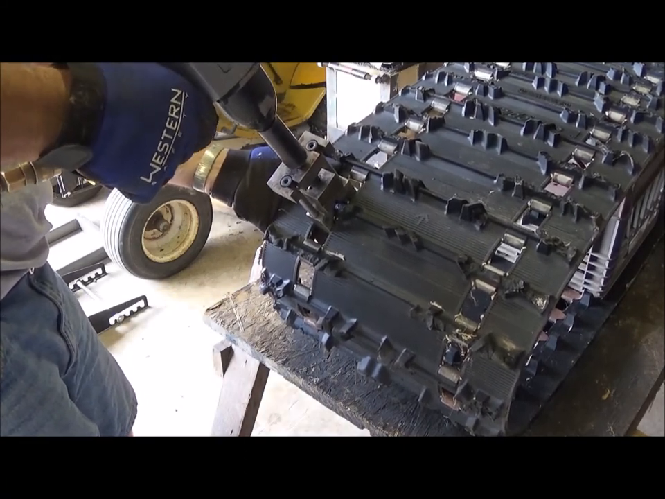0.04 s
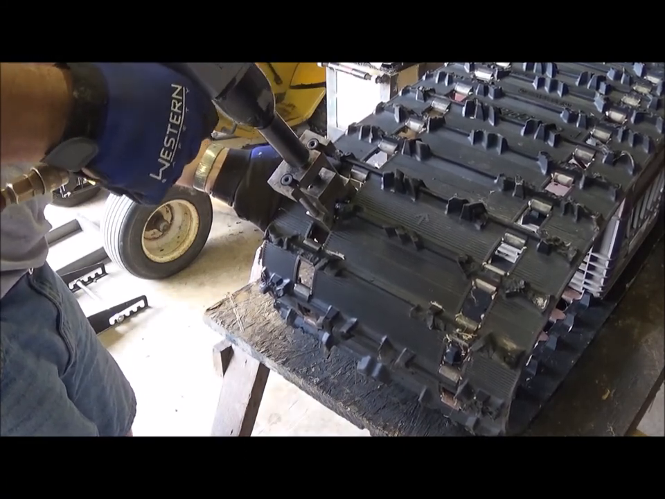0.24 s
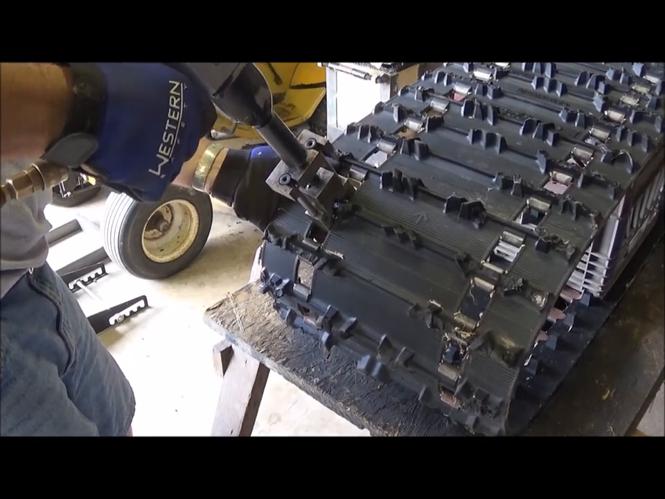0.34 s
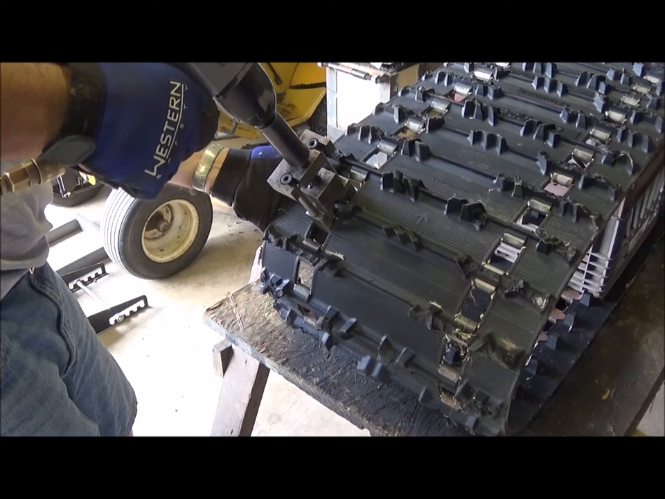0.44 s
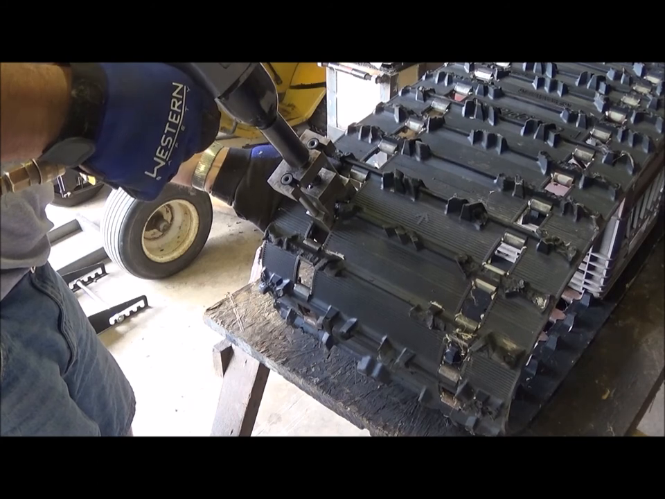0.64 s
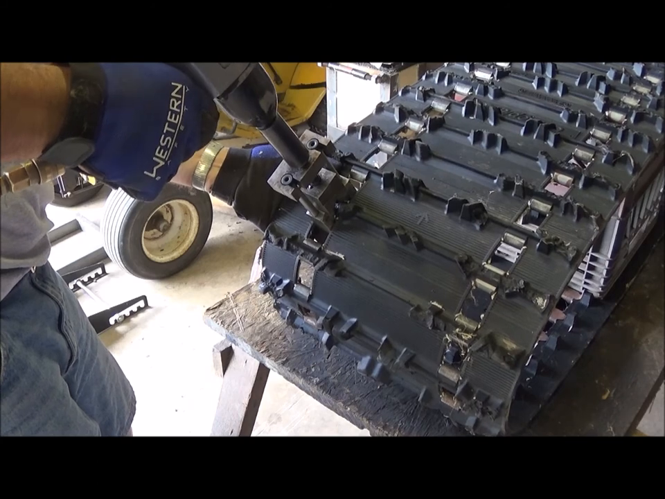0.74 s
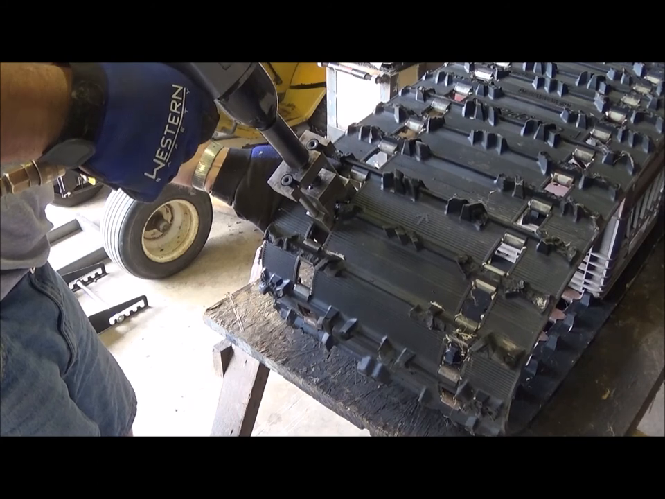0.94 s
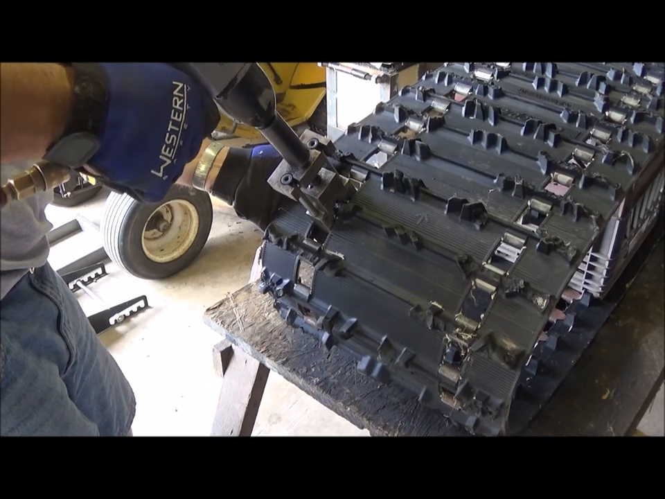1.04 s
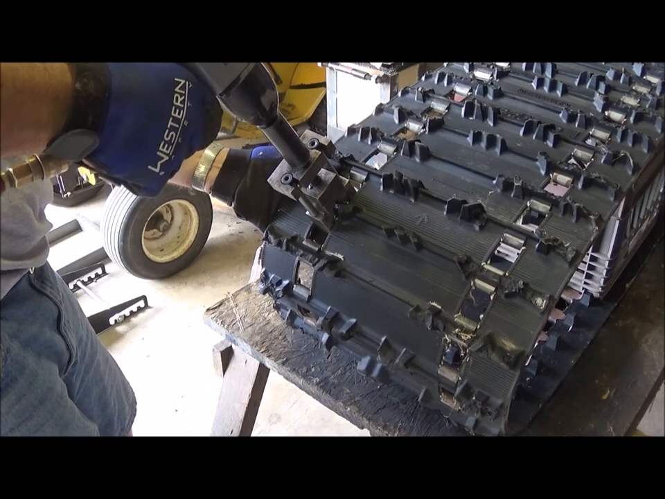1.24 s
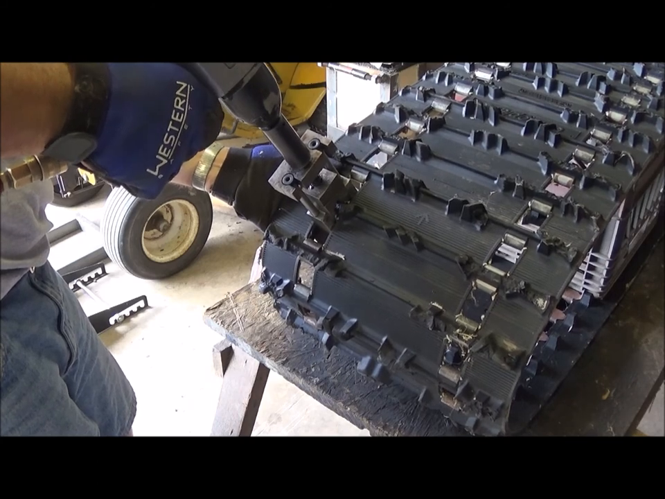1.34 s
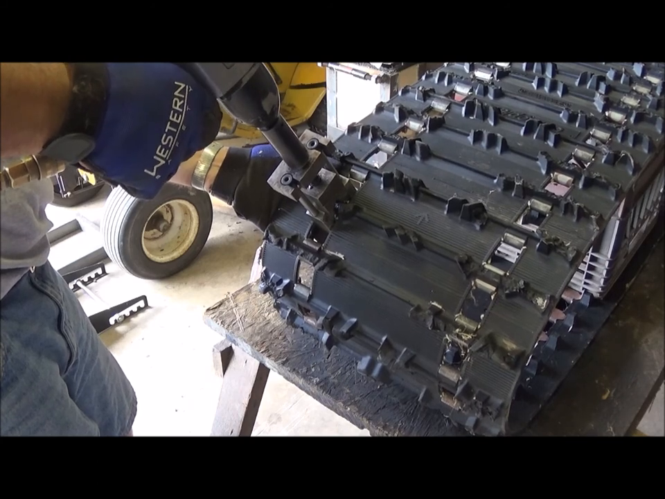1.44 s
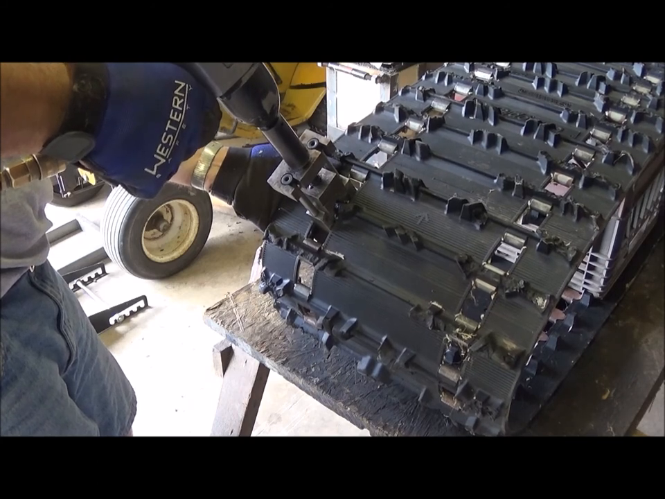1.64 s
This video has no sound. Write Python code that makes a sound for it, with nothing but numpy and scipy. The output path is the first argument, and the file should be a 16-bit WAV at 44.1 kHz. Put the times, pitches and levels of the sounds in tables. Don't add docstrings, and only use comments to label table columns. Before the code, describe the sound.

An air-powered wrench close to the microphone gives two brief loud bursts, each opening with a knock and hiss, buzzing with metallic hammering, then ending in a clack; garage echo, faint bird and trill between.

```python
import sys
import numpy as np
from scipy import signal
from scipy.fft import rfft, irfft
from scipy.io import wavfile
from scipy.ndimage import uniform_filter1d

SR = 44100
rng = np.random.default_rng(int(sys.argv[2]) if len(sys.argv) > 2 else 0)


def field_ratio(decibels):
    return 10 ** (np.asarray(decibels, dtype=float) / 20)


def to_wav(s):
    ch = np.atleast_2d(s).T
    pcm = np.round(np.clip(ch, -1, 1) * 32767)
    wavfile.write(sys.argv[1], SR, pcm.astype(np.int16))


N = 74970

# frequency in Hz, density in dB per Hz.
RATTLE = [(110, -52), (230, -11.5), (460, -18), (900, -6.5), (1300, -10.5), (5000, -3.5), (10500, -10.5),
          (16000, -20.5)]


def evened(x):
    return x / np.sqrt(np.mean(x ** 2) + 1e-20)


def read(points, hz):
    f, value = np.transpose(points)
    return np.interp(np.log(hz + 1), np.log(f + 1), value)


def colour(x, points):
    hz = np.fft.rfftfreq(x.shape[-1], 1 / SR)
    return irfft(rfft(x) * field_ratio(read(points, hz)), x.shape[-1])


def add(mix, s, sound):
    part = mix[round(s * SR):][:len(sound)]
    part += sound[:len(part)]


def resonate(x, hz, width):
    turn = np.exp(2j * np.pi * hz * np.arange(len(x)) / SR)
    r = np.exp(-np.pi * width / SR)
    return 2 * (turn * signal.lfilter([1 - r], [1, -r], x / turn)).real


def bank(x, modes):
    return evened(sum(field_ratio(db) * evened(resonate(resonate(x, f, w), f, w)) for f, w, db in modes))


def pair(x, same):
    common = x[0] * np.sqrt((1 + same) / 2)
    different = x[1] * np.sqrt((1 - same) / 2)
    return np.array([common + different, common - different])


def vane_turns(run, coast, top_hz):
    spin_s, spin_from, coast_slow, jitter = .032, .45, .1, .012
    hz = top_hz * (1 - spin_from * np.exp(-(run / spin_s) ** 1.5 / 2)) * (1 - coast_slow * coast)
    wander = evened(uniform_filter1d(rng.standard_normal(len(run)), size=300))
    return np.cumsum(hz * (1 + jitter * wander)) / SR


def exhaust(puffs, upper):
    # resonance in Hz, width in Hz, level in dB.
    port_modes = [(5080, 770, 4.5), (5498, 550, -1), (8680, 370, -2), (9680, 1100, 1)]
    a, d = rng.standard_normal((2, len(puffs)))
    low_ports = bank(puffs * a, port_modes[:2])
    high_ports = upper * field_ratio(-1) * bank(puffs * a, port_modes[2:])
    leak = field_ratio(-12) * evened(colour(puffs * d, RATTLE))
    low_pass = signal.butter(2, 200, fs=SR, output="sos")
    rumble = field_ratio(-47.5) * evened(signal.sosfilt(low_pass, d))
    return field_ratio(-3) * (low_ports + high_ports) / np.sqrt(2) + upper * leak + rumble


def housing(puffs):
    # resonance in Hz, width in Hz, level in dB.
    housing_modes = [(898, 140, -12.5), (1098.5, 70, -12.5), (1580, 440, -9.5), (2309, 140, -9),
                     (2729, 130, -6), (3350, 130, -8), (4173, 190, -8.5), (8200, 1200, -3)]
    b, c = rng.standard_normal((2, len(puffs)))
    return field_ratio(-8) * bank(puffs * b, housing_modes) + field_ratio(-2.5) * evened(colour(puffs * c, RATTLE))


def vane_hum(turns, size):
    # multiple of the vane rate, level in dB.
    harmonics = [(1, -.5), (2, -1.5), (3, -6), (4, -7)]
    tone = sum(field_ratio(db) * np.sin(2 * np.pi * k * turns) for k, db in harmonics)
    return field_ratio(-19.5) * uniform_filter1d(size, size=400) * tone


def air_burst(opens, shuts, stops, pressure_db, top_hz):
    hiss_rise_s, motor_lag_s, motor_rise_s = .018, .034, .036
    valve_snap_s, rotor_stop_s = .002, .0045
    coast_db, coast_fade_db = -9.5, -6
    t = np.arange(0, stops - opens, 1 / SR)
    on = shuts - opens
    run = np.maximum(t - motor_lag_s, 0)
    coast = np.clip((t - on) / (stops - shuts), 0, 1)
    turns = vane_turns(run, coast, top_hz)
    size = field_ratio(4 * rng.standard_normal(200))[turns.astype(int)]
    puffs = .69 + size * np.exp(-(turns % 1) / .35)
    shut = np.clip((t - on) / valve_snap_s, 0, 1)
    held = field_ratio(pressure_db - .5 * t / on)
    air = held * np.minimum(t / hiss_rise_s, 1) ** 1.43 * (1 - shut)
    motor = held * np.minimum(run / motor_rise_s, 1) * field_ratio(shut * coast_db + coast_fade_db * coast)
    motor = motor * np.minimum((t[-1] - t) / rotor_stop_s, 1)
    upper = np.minimum(t / (1.6 * hiss_rise_s), 1)
    noise = air * exhaust(puffs, upper) + motor * housing(puffs)
    return noise, motor * vane_hum(turns, size) * (1 - coast)


def hammer_blow(db, bright, ring_db):
    crack_t60_s, anvil_t60_s, contact_s = .025, .14, .0005
    t = np.arange(6000) / SR
    n = rng.standard_normal(len(t))
    crack = (1 - bright) * bank(n, [(3200, 9000, 0)]) + bright * bank(n, [(9700, 3200, 0)])
    ring = bank(n[::-1], [(14890, 70, 0)])[::-1]
    ring = ring * field_ratio(ring_db - 10 - 60 * t / anvil_t60_s)
    struck = .5 * crack * field_ratio(db - 60 * t / crack_t60_s) + ring
    struck = struck * np.minimum(t / contact_s, 1)
    return signal.sosfilt(signal.butter(2, 750, "highpass", fs=SR, output="sos"), struck)


def valve_thunk(db, tilt_db):
    # resonance in Hz, width in Hz, level in dB.
    valve_modes = [(360, 130, -6), (800, 200, -8), (1100, 70, -3), (1620, 400, -13), (2350, 160, -6)]
    t60_s, rise_s, bell_hz = .045, .0012, 1098
    t = np.arange(5000) / SR
    lowest_hz = valve_modes[0][0]
    tilted = [(f, w, g + tilt_db * np.log2(f / lowest_hz)) for f, w, g in valve_modes]
    bell = field_ratio(-3 + 2 * tilt_db) * np.sin(2 * np.pi * bell_hz * t)
    body = bank(rng.standard_normal(len(t)), tilted) + bell
    return field_ratio(db - 60 * t / t60_s) * np.minimum(t / rise_s, 1) * body


def inlet_squeal(half, db):
    t = np.arange(-3 * half, 3 * half, 1 / SR)
    breath = bank(rng.standard_normal(4000), [(9100, 1300, 0)])[:len(t)]
    return field_ratio(db) * np.exp(-(t / half) ** 2) * breath


def garage(x):
    # frequency in Hz, T60 in seconds.
    decay = [(200, 0.46), (530, 0.61), (1390, 0.5), (3680, .55), (7500, .52), (11000, 0.38), (15000, 0.33)]
    # frequency in Hz, level returned in dB.
    walls = [(60, -21.5), (280, 7.5), (700, 2.85), (3500, 0), (5200, -3), (7500, 3), (10000, -2),
             (15000, -6)]
    taps = np.zeros((2, SR))
    at = np.arange(200, SR - 20, 20) + rng.integers(0, 20, (2, (SR - 201) // 20))
    np.put_along_axis(taps, at, rng.choice([-1., 1.], at.shape), 1)
    hz, t, z = signal.stft(pair(taps, .86), SR, nperseg=256)
    tail = signal.istft(z * field_ratio(-60 * t / read(decay, hz)[:, None]), SR, nperseg=256)[1]
    tail = tail / np.linalg.norm(tail[0])
    return field_ratio(-7) * signal.fftconvolve(colour(x, walls)[None], tail, axes=1)[:, :N]


def bird():
    # start in seconds, length in seconds, first and last pitch in Hz, level in dB.
    whistles = [
        (.764, 0.049, 3350, 2740, -63),
        (.808, 0.026, 2540, 2670, -63),
        (.842, .045, 2560, 1950, -61),
        (.93, 0.04, 2180, 2155, -64),
        (.972, 0.039, 3010, 2820, -61.5),
    ]
    out = np.zeros(N)
    for start, length, from_hz, to_hz, db in whistles:
        u = np.arange(0, 1, 1 / (length * SR))
        phase = 2 * np.pi * np.cumsum(from_hz + (to_hz - from_hz) * u) / SR
        add(out, start, field_ratio(db - 1.5) * np.sin(np.pi * u) ** .53 * np.sin(phase))
    flutter = evened(uniform_filter1d(rng.standard_normal(N), size=250))
    return out * field_ratio(3 * (flutter + 3.5))


def trill():
    tone_hz, first_s, every_s, pulse_s = 2570, .027, .0333, .004
    t = np.arange(N) / SR
    beat = (t - first_s) / every_s
    nearest = np.round(beat)
    pulses = np.exp(-((beat - nearest) * every_s / pulse_s) ** 2)
    size = field_ratio(2.5 * rng.standard_normal(60))[nearest.astype(int) + 1]
    return field_ratio(-56.5) * size * pulses * np.sin(2 * np.pi * tone_hz * t)


def room_hush():
    # frequency in Hz, density in dB per Hz.
    hush_spectrum = [(30, -33.5), (120, -11.5), (300, -6), (800, -5), (2800, -5.5), (6500, -10),
                     (12000, -15.5), (15500, -24.5)]
    return field_ratio(-57.5) * evened(colour(pair(rng.standard_normal((2, N)), .64), hush_spectrum))


def scene():
    # valve opens, valve shuts and rotor stops in seconds, pressure in dB, top vane rate in Hz.
    bursts = [
        (.219, .4445, .486, -13, 284),
        (1.028, 1.269, 1.318, -14, 268),
    ]
    # time in seconds, peak in dB, brightness 0-1, anvil ring in dB.
    blows = [(0.2595, -9.5, 0.07, -27), (.2737, -0.5, 0, -32.5), (0.289, -2.5, 0.9, -46.5),
             (.353, -6, .3, -26), (0.376, 2.5, 0.2, -24.5), (.4238, -0.5, .15, -41),
             (0.4482, -1, 0.12, -13), (0.4864, -0.5, 0.28, -32.5), (.490, -24, 0.9, -44.5),
             (1.0615, -7.5, 0, -29.5), (1.066, -4, 0, -33.5), (1.073, -0.5, 0.8, -31),
             (1.0818, -7.5, 0, -37.5), (1.093, -2, 1, -34.5), (1.17, -25, .5, -24.5),
             (1.19, -33.5, .5, -18.5), (1.213, -22, 0.5, -17.5), (1.241, -4.5, 0, -24.5),
             (1.242, -27, 0.7, -34.5), (1.259, -20, .7, -37.5), (1.2659, -2.5, 0, -22.5),
             (1.27, -16, 0.9, -33), (1.3183, -6, .05, -43.5), (1.3199, -5.5, 0.69, -41.5)]
    # time in seconds, peak in dB, spectral tilt in dB per octave (negative is duller).
    knocks = [
        (.2195, -37, -6),
        (.2372, -15, .1),
        (1.027, -38, -6),
        (1.0375, -20, .1),
    ]
    # centre in seconds, half length in seconds, level in dB.
    squeals = [
        (0.253, 0.0075, -12.5),
        (1.055, .007, -15.5),
    ]
    tool, hum = np.zeros((2, N))
    for opens, *row in bursts:
        noise, tone = air_burst(opens, *row)
        add(tool, opens, noise + tone)
        add(hum, opens, tone)
    for s, *row in blows:
        add(tool, s, hammer_blow(*row))
    for s, *row in knocks:
        add(tool, s, valve_thunk(*row))
    for s, half, db in squeals:
        add(tool, s - 3 * half, inlet_squeal(half, db))
    far = bird() + trill()
    reverberant = garage(tool - .65 * hum + .53 * far)
    return tool * field_ratio([[-.17], [0]]) + reverberant + far + room_hush()


def top_cut(x):
    return signal.sosfilt(signal.butter(12, 16110, fs=SR, output="sos"), x)


def record(dry):
    # frequency in Hz, level of the side signal in dB.
    side_response = [(60, -30), (250, -9.5), (600, 0.2), (2500, -0.5), (5000, 3), (9000, 2.5),
                     (11000, -3.5), (16000, -15)]
    mid = dry.mean(0)
    side = colour(dry[0] - mid, side_response)
    stereo = np.array([mid + side, mid - side])
    return top_cut(np.tanh(stereo + stereo ** 3 / 3) * 0.94)


dry = scene()
out = record(dry)
to_wav(out)
```